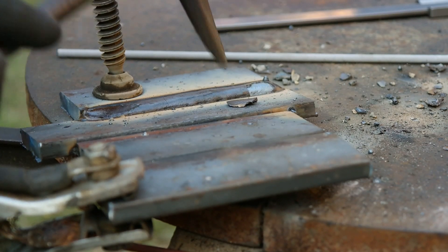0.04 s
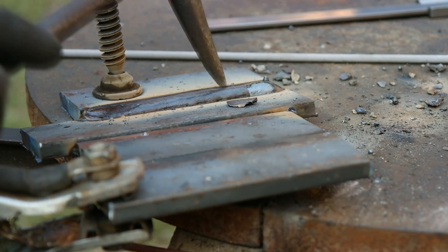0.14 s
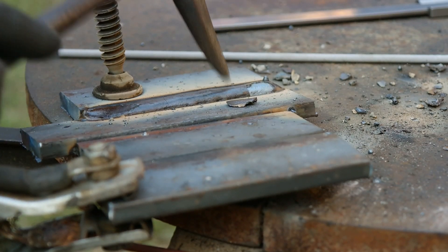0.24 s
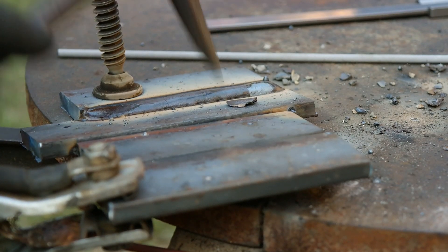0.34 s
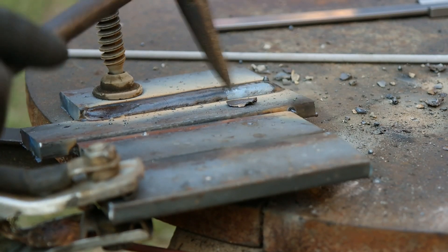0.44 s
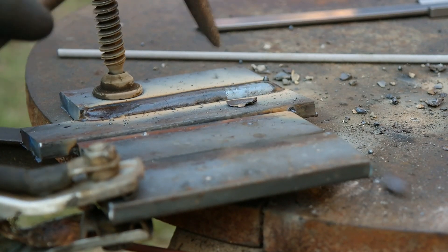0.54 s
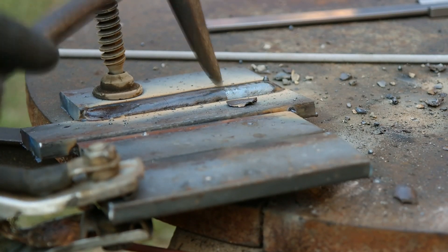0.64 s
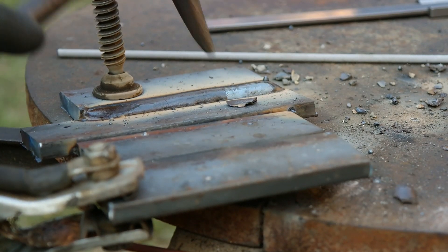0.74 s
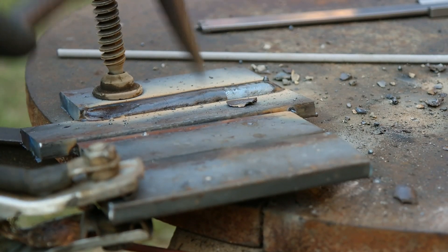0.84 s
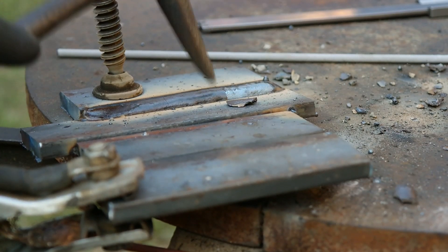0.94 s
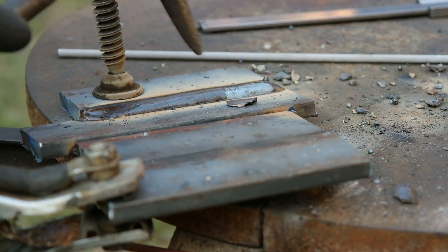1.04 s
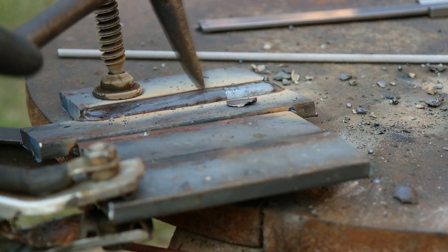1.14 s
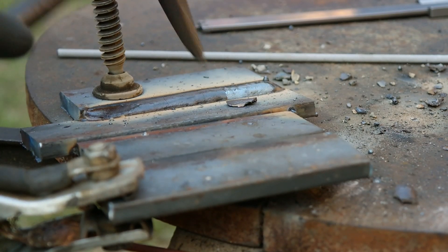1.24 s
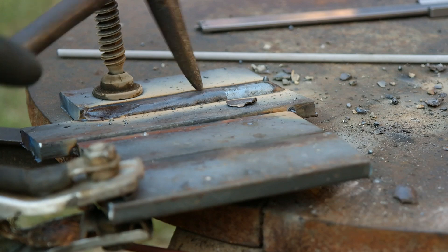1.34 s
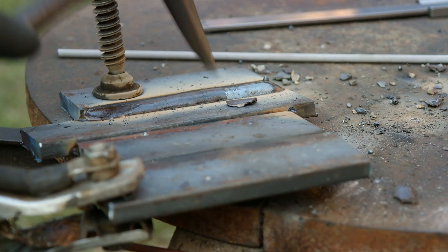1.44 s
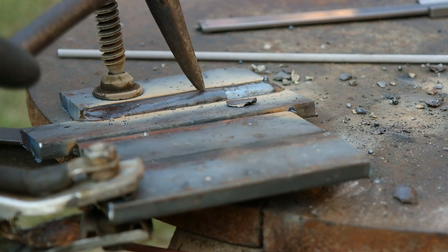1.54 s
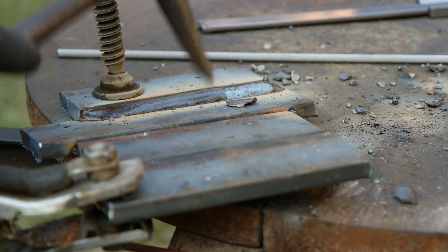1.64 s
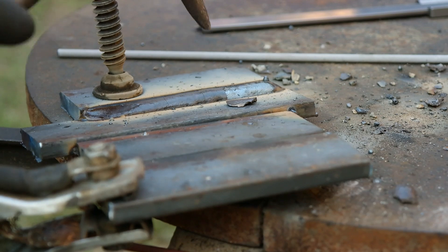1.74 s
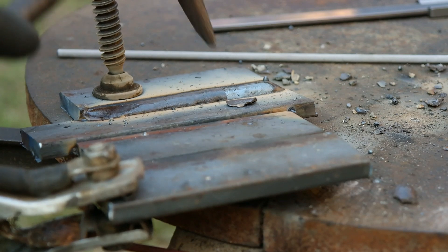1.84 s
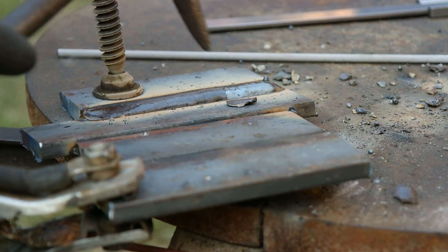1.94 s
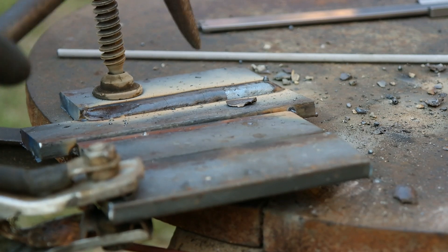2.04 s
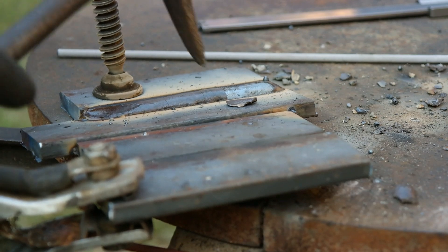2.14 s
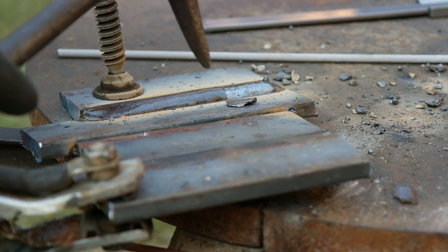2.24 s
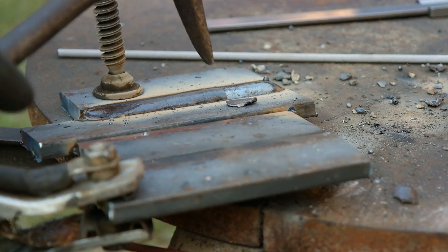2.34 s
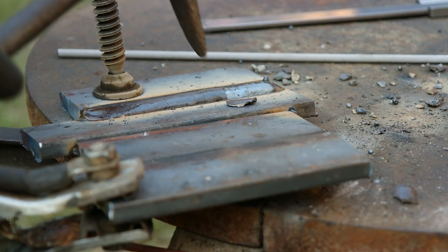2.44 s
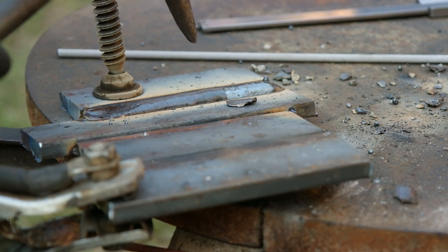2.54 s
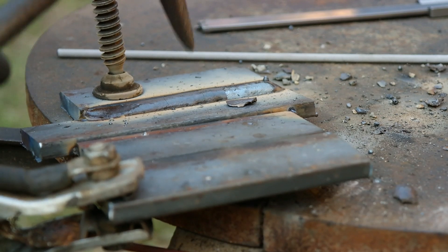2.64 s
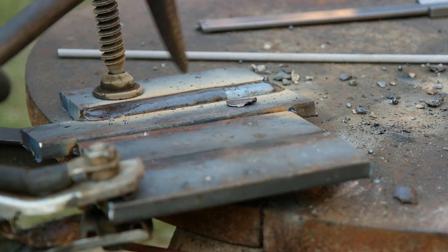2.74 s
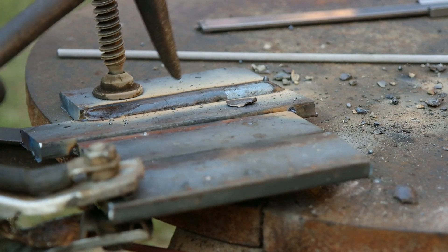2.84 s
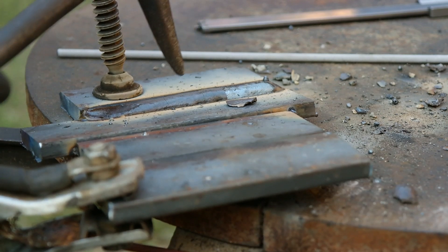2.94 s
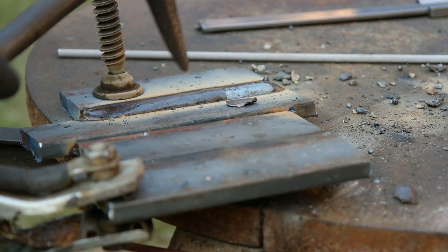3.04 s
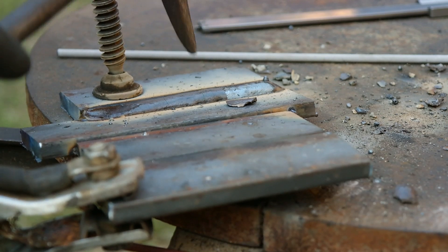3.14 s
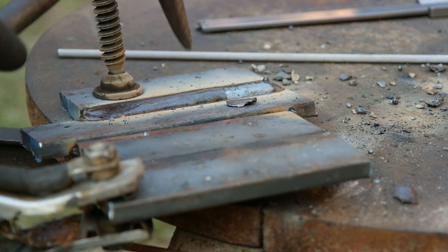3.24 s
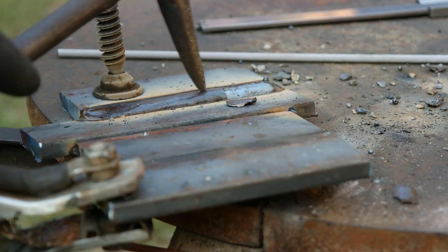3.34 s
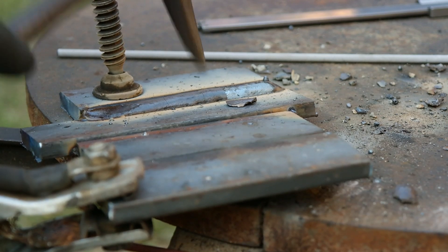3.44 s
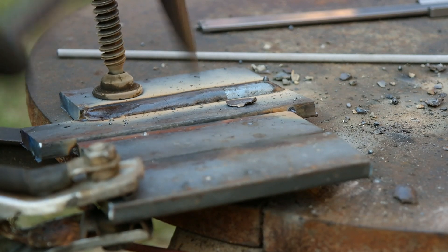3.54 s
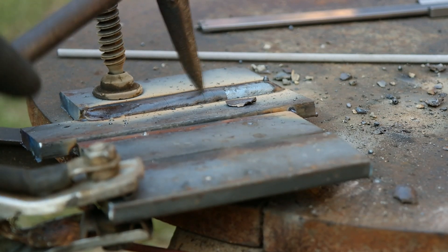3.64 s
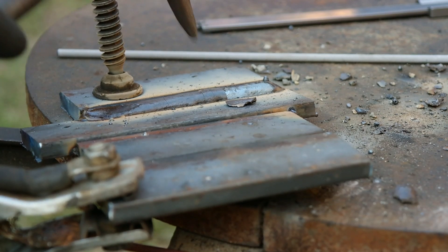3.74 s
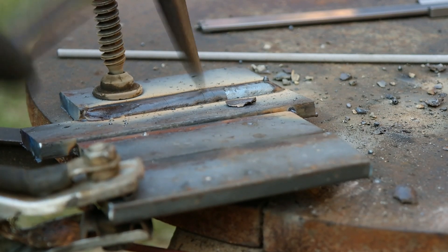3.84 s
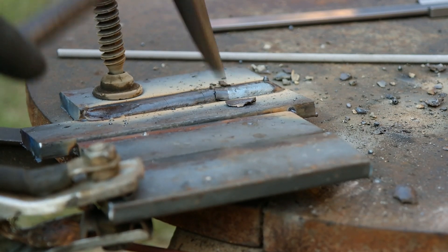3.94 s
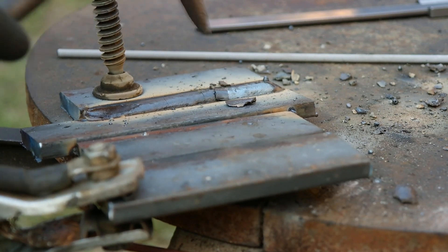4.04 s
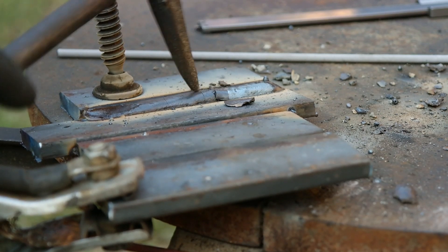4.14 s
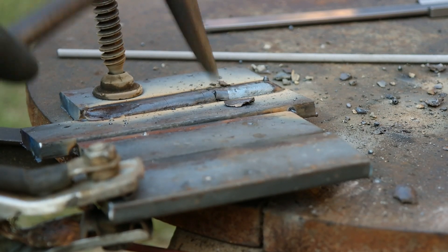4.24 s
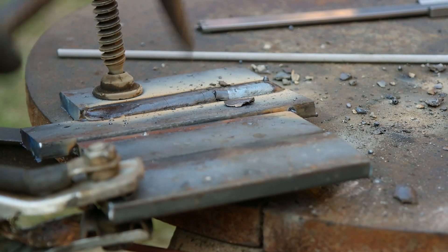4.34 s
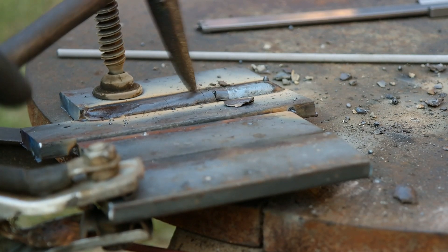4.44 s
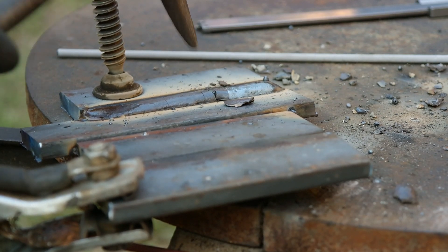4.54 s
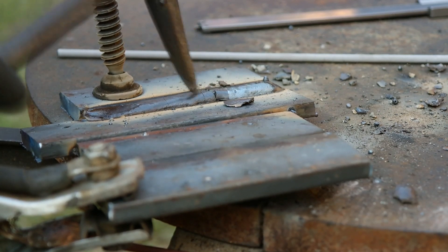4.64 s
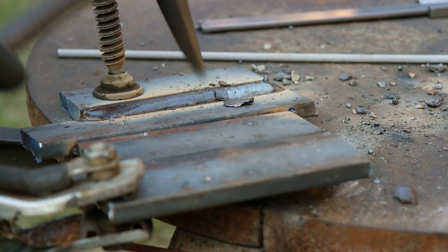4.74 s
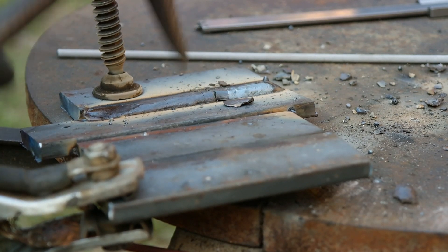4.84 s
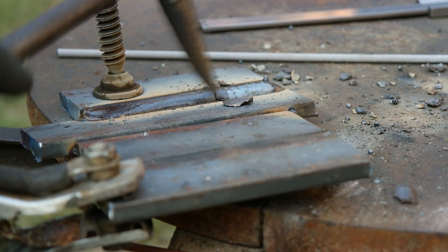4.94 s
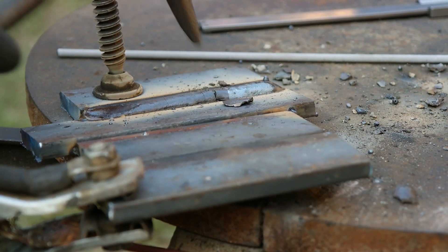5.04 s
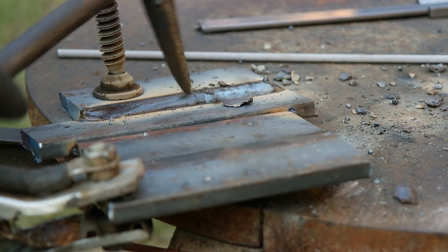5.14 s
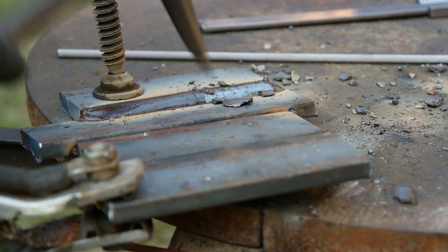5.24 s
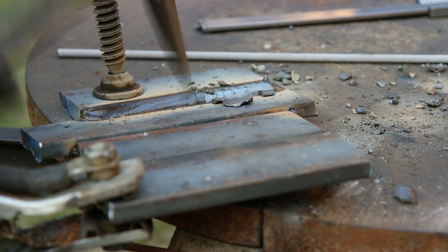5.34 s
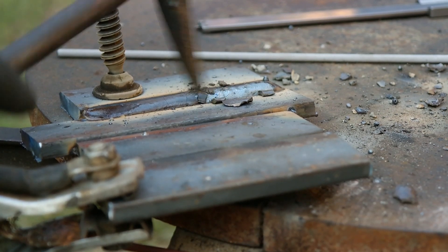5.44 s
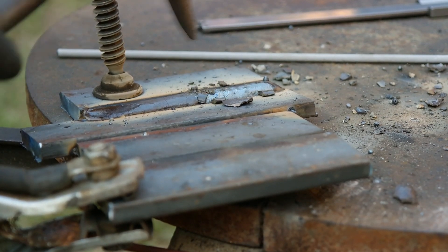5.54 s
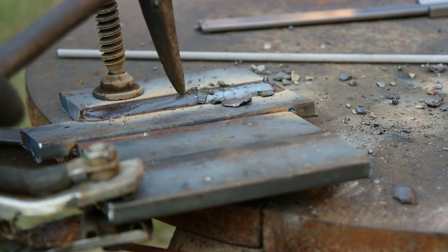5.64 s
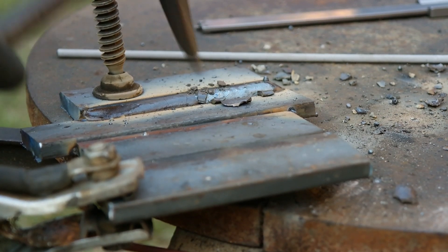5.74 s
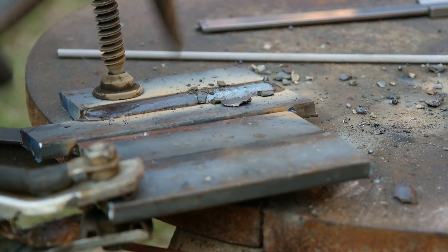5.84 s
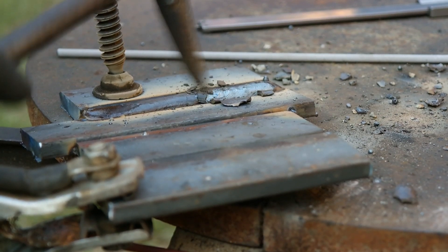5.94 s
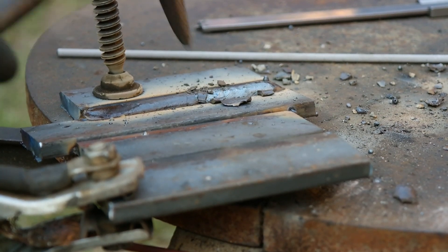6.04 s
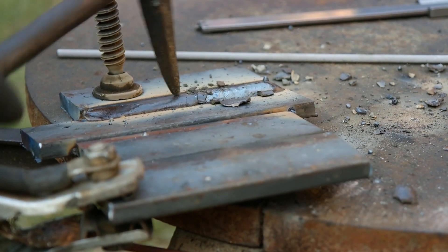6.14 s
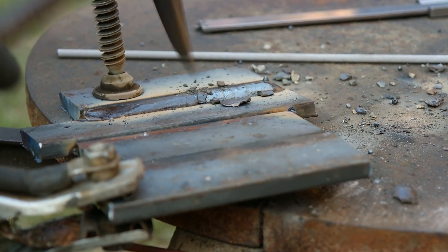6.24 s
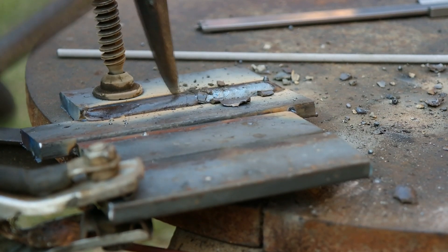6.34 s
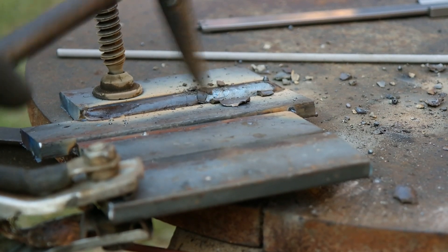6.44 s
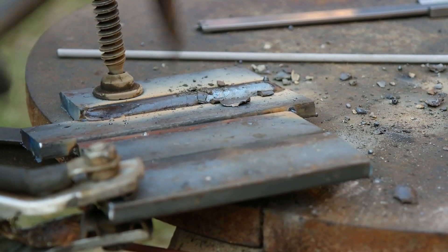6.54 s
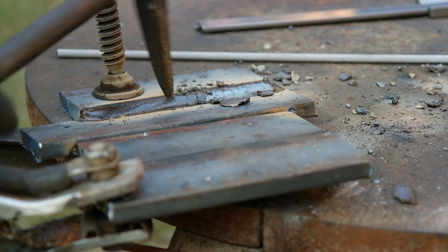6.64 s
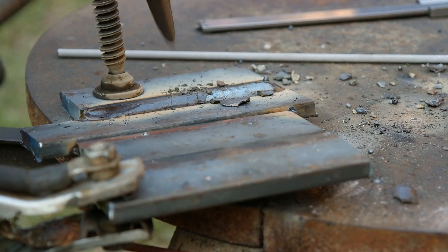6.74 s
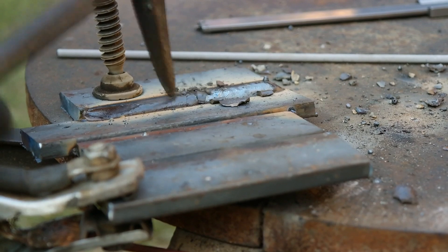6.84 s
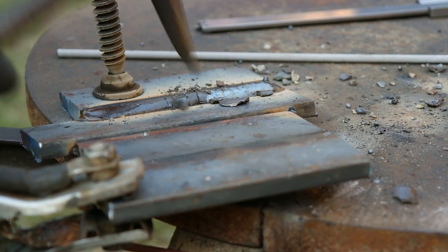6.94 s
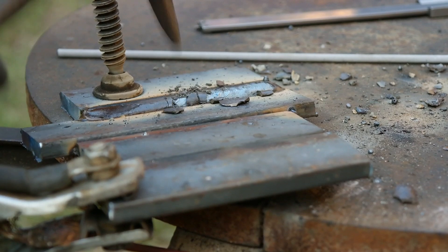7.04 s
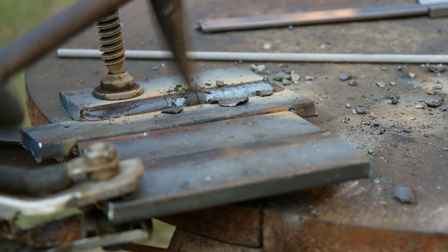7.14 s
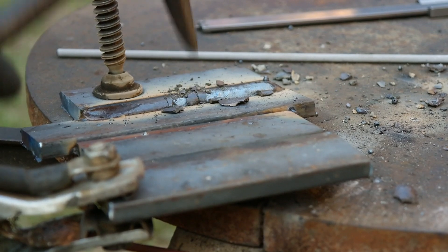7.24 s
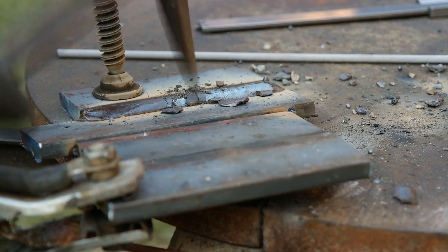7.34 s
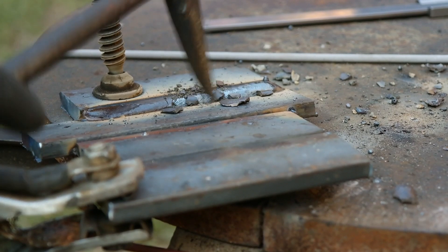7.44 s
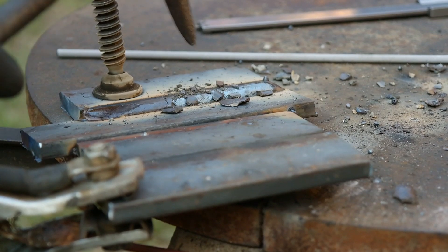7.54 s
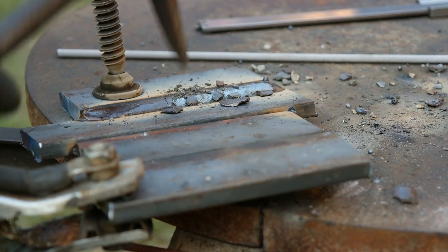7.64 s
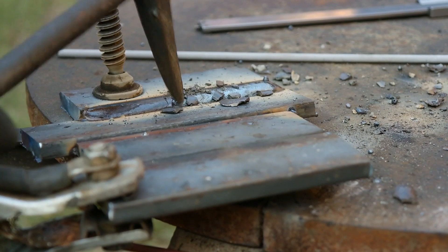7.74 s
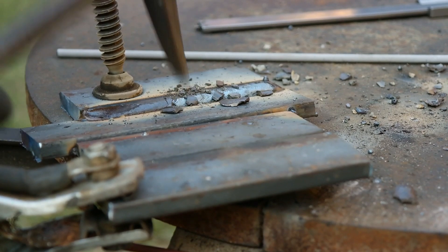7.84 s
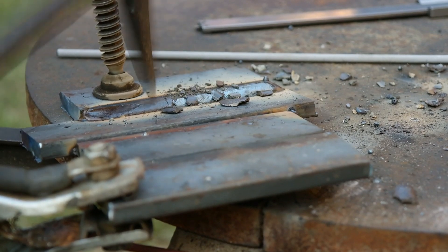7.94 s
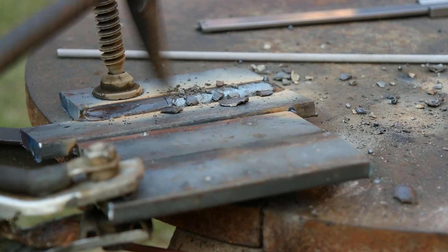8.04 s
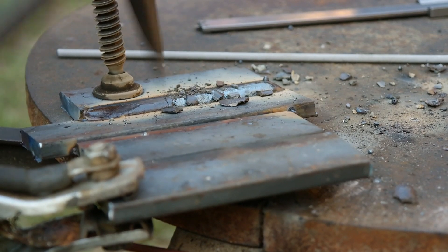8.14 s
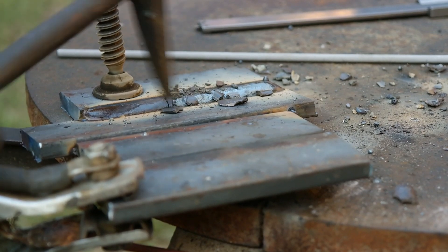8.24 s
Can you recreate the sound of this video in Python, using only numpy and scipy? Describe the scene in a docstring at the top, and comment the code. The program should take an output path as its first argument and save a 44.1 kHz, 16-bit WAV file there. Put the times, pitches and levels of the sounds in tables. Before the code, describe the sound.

In a quiet yard, close to a stereo microphone, a steel chipping hammer begins striking slag on a weld almost at once. Eight blows fall from 0.06 to 1.7 s, roughly four a second: hard broadband cracks, briefly ringing hammer head, clanking plate and table, thin bar ring and loose rattle. The blow near 0.8 s is weaker with a strong high ping. The hammering then pauses over faint hiss, low wash, hum and rumble. From 2.2 to 2.6 s a flurry of dull hollow pops glides down in pitch amid soft scrabbling; a loose plate clinks faintly at 3.0 s. Blows resume at 3.47 s, steady every quarter second, becoming squarer and brighter, slag crumbling, with small rebounds and high pings of fragments, clearest from 5.3 s. Soft clinks come near 7 s, an irregular double hit at 7.5, weaker taps around 7.9, and a very loud overloaded crack at 8.1 s, ringing into the end at about 8.3 s.

```python
"""A yard: a steel chipping hammer strikes slag on a weld, about four blows a second, close to a stereo microphone.
Each blow is a noise crack with decaying modes of hammer head, steel table and bar, a rattle and a high ping.
Small knocks and rebounds snap around the blows, a loose plate clinks, and in a pause dull pops glide down in pitch.
Filtered noise gives the hiss, low wash and rumble, and wavering sines a faint hum; loud blows overload."""
import sys
import numpy as np
from scipy import signal
from scipy.fft import rfft, irfft, next_fast_len
from scipy.io import wavfile
from scipy.ndimage import uniform_filter1d

SR = 44100
rng = np.random.default_rng(int(sys.argv[2]) if len(sys.argv) > 2 else 0)


def put_to_file(sound):
    """Save the sound as 16-bit audio at rate SR, in the file named by the first command-line argument."""
    columns = np.atleast_2d(sound).T  # one column per channel
    safe = np.clip(columns, -1, 1)
    whole_steps = np.round(safe * 32767)
    wavfile.write(sys.argv[1], SR, whole_steps.astype(np.int16))


N = 366030  # samples


def gain_of(db):
    """Level law: 20 dB is a factor of ten in amplitude."""
    return 10 ** (np.asarray(db) / 20)


def evened(x):
    """Normalization: scale to unit root mean square."""
    return x / np.sqrt(np.mean(x ** 2) + 1e-20)


def read(points, hz):
    """Spectral envelope: interpolate a curve along a logarithmic frequency axis."""
    f, value = np.transpose(points)
    return np.interp(np.log(hz + 1), np.log(f + 1), value)


def add(mix, start_s, sound):
    """Superposition: pressures of overlapping sounds add."""
    part = mix[..., round(start_s * SR):][..., :sound.shape[-1]]
    part += sound[..., :part.shape[-1]]


def ring(modes, db, spread_db, detune, buzz_db, rise_s, seconds):
    """Modal decay: dying sines with chance in level and pitch; loose contact makes each one buzz."""
    hz, mode_db, t60 = np.transpose(modes)[..., None]
    t = np.arange(round(seconds * SR)) / SR
    share, pitch, phase = rng.standard_normal((3, len(modes), 1))
    steps = rng.standard_normal((len(modes), round(seconds * 60) + 2))  # 60 a second
    buzz = np.array([np.interp(t, np.arange(len(v)) / 60, v) for v in steps])
    level = gain_of(db + mode_db + spread_db * share + buzz_db * buzz - 60 * t / abs(t60))
    sines = np.sin(2 * np.pi * hz * (1 + detune * pitch) * t + phase)
    return (level * sines).sum(0) * (1 - np.exp(-t / rise_s))


def burst(colour, t60, tilt_db, flicker_db, same, seconds):
    """Frequency-dependent damping: stereo noise whose bands die at their own speeds, in uneven jolts."""
    white = rng.standard_normal((2, round(seconds * SR)))
    hz, t, z = signal.stft(white, SR, nperseg=256, noverlap=192)
    shape = gain_of(read(colour, hz) + tilt_db * np.log2((hz + 100) / 2000))
    jolts = evened(uniform_filter1d(rng.standard_normal(z.shape[1:]), size=24, axis=0))
    right = same * z[0] + np.sqrt(1 - same ** 2) * z[1]
    z = np.array([z[0], right])
    decay_db = -60 * t / read(t60, hz)[:, None]
    z *= evened(shape)[:, None] * gain_of(flicker_db * jolts + decay_db)
    return signal.istft(z, SR, nperseg=256, noverlap=192)[1]


# level of the low rumble: time_s, level_db
RUMBLE_LEVEL = [(0.0, -66), (1.23, -72), (1.55, -65), (1.92, -75), (2.36, -66.5), (3.47, -76.5),
                (3.65, -76), (4.64, -74), (4.99, -58), (5.52, -71), (5.85, -60), (6.24, -72), (6.63, -58),
                (7.03, -74), (7.74, -61), (8.3, -95.5)]


def rumble():
    """Partial coherence: band-passed low noise that comes and goes, partly different in each channel."""
    band = signal.butter(2, [78, 135], "band", fs=SR, output="sos")
    low = signal.sosfilt(band, rng.standard_normal((3, N)))
    level_db = np.interp(np.arange(N) / SR, *np.transpose(RUMBLE_LEVEL))
    return gain_of(level_db) * evened(low[0] + .5 * low[1:])


# spectral density of the yard noise: frequency_hz, relative density_db (per Hz)
YARD_COLOUR = [(18, -53), (30, -22.5), (138, -16.5), (287, -2.5), (426, -7.5), (526, -1), (666, -10.5),
               (740, -12.5), (801, -7.5), (2410, -18.5), (3400, -20.5), (14400, -31), (16000, -31.5)]
# swelling of the two halves of the noise: time_s, relative low wash level_db, relative hiss level_db
YARD_LEVEL = [(0.0, -48, -55), (1.6, -48.5, -49), (2.01, -47, -50.5), (2.52, -47, -48),
              (2.75, -49.5, -50.5), (3.07, -48, -52), (3.28, -50.5, -56.5), (3.47, -56.5, -62.5),
              (3.65, -46, -50), (4.4, -48.5, -57), (4.8, -47.5, -53), (5.6, -45.5, -53), (6.2, -48.5, -50),
              (7.2, -47, -48), (7.8, -47.5, -54), (8.3, -47.5, -51)]
# left-right correlation of the noise: frequency_hz, likeness (ratio)
YARD_LIKENESS = [(60, .8), (240, 0.97), (950, 0.57), (3770, 0.054), (15000, 0.15)]


def yard_noise():
    """Diffuse field: patchy noise, its likeness left and right set by pitch, whose wash and hiss swell apart."""
    frames, hz = N // 256 + 5, np.fft.rfftfreq(1024, 1 / SR)
    a, b, c, d, patches = rng.standard_normal((frames, 513, 5)).T
    patches = evened(uniform_filter1d(uniform_filter1d(patches, size=12, axis=0), size=8, axis=1))
    s, wash_db, hiss_db = np.transpose(YARD_LEVEL)
    wash_db, hiss_db = (np.interp(np.arange(frames) * 256 / SR, s, v) for v in (wash_db, hiss_db))
    # the hiss flickers
    hiss_db = hiss_db + 1.5 * evened(uniform_filter1d(rng.standard_normal(frames), size=5))
    shape, low = gain_of(read(YARD_COLOUR, hz)), 1 / (1 + (hz / 2000) ** 2)
    wash = np.outer(evened(shape * low), gain_of(wash_db))
    hiss = np.outer(evened(shape * (1 - low)), gain_of(hiss_db))
    same = np.clip(read(YARD_LIKENESS, hz), -1, 1)[:, None]
    left = a + 1j * b
    right = same * left + np.sqrt(1 - same ** 2) * (c + 1j * d)
    z = np.array([left, right]) * (wash + hiss) * gain_of(0.5 * patches)
    unit = np.sqrt(np.mean(signal.istft(left, nperseg=1024, noverlap=768)[1] ** 2))
    return gain_of(-2.5) * signal.istft(z, nperseg=1024, noverlap=768)[1][:, :N] / unit


# partials of the hum: pitch_hz, relative level_db
HUM_PARTIALS = [(533, -59), (635, -60.5), (732, -56.5), (834, -81), (931, -63.5)]


def hum():
    """Slow modulation: steady sines waver in level and phase and follow the level of the wash."""
    t = np.arange(N) / SR
    drift = rng.standard_normal((len(HUM_PARTIALS), N))
    waver = evened(uniform_filter1d(drift, size=4000, axis=1))
    tones = sum(gain_of(db + 1.0 * w) * np.sin(2 * np.pi * f * t + 0.83 * w)
                for (f, db), w in zip(HUM_PARTIALS, waver))
    s, wash_db, _ = np.transpose(YARD_LEVEL)
    return tones * gain_of(np.interp(t, s, wash_db) + 53.5)


# dull pops that fall in pitch: start_s, level_db, end pitch_hz, start pitch (factor), t60_s
POP_EVENTS = [(2.212, -36, 525, 3.9, 0.036), (2.249, -33, 750, 3.5, 0.025), (2.299, -37, 730, 2.4, 0.03),
              (2.335, -30, 383, 2.7, 0.044), (2.41, -28, 343, 3.2, 0.032), (2.469, -25.5, 328, 2.4, 0.037),
              (2.504, -26.5, 600, 2.4, 0.045), (2.526, -22.5, 656, 3.9, 0.04),
              (2.564, -32, 586, 2.5, 0.049), (2.591, -23, 613, 4.4, 0.037)]


def pops():
    """Frequency glide: each pop slides to its pitch in milliseconds, with a hollow thud and faint scrabbling."""
    mix, t = np.zeros(N), np.arange(3000) / SR
    for s, db, hz, start, t60 in POP_EVENTS:
        turns = np.cumsum(hz * (1 + (start - 1) * np.exp(-t / 0.0011))) / SR
        glide = np.minimum(t / 0.001, 1) * np.sin(2 * np.pi * turns)
        add(mix, s, gain_of(db - 60 * t / abs(t60)) * glide)
        thud_hz = 330 + 350 * (s - 2.25)  # later thuds are higher
        thud = np.minimum(t / 0.0025, 1) * np.sin(2 * np.pi * thud_hz * t)
        add(mix, s + 0.00346, gain_of(db - 2.0 - 60 * t / 0.037) * thud)
        tick = uniform_filter1d(rng.standard_normal(len(t)), size=6)
        add(mix, s, gain_of(db - 10 - 60 * t / 0.025) * tick)
    # scrabbling: about 320 random grains a second at its busiest
    busy = np.interp(np.arange(N) / SR, [2.15, 2.25, 2.6, 2.75], [0, 1, 1, 0])
    grains = (rng.random(N) < 320 / SR) * rng.standard_normal(N) * busy
    tones = sum(part * np.sin(2 * np.pi * hz * t) for hz, part in [(330, 1), (950, 0.72), (2600, 0.12)])
    grain = gain_of(-44.5 - 60 * t / 0.024) * tones
    high_pass = signal.butter(2, 160, "high", fs=SR, output="sos")
    return signal.sosfilt(high_pass, mix + signal.oaconvolve(grains, grain)[:N])


# soft clinks: start_s, level_db
CLINK_EVENTS = [(3.0066, -33), (3.047, -41.5), (6.9546, -25.5), (7.1561, -29.5)]
# modes of the loose plate: pitch_hz, level_db (about the clink), t60_s
CLINK_MODES = [(1325, 11.5, 0.035), (1420, 4, 0.043), (2095, -15, 0.14), (778, -7, 0.15)]


def clinks(mix):
    """Modal decay with a slow rise: a loose plate clinks softly."""
    for s, db in CLINK_EVENTS:
        add(mix, s, ring(CLINK_MODES, db, 1.1, 0.0031, 1.1, 0.01, 0.066))


# spectral density of first contact: frequency_hz, relative density_db (per Hz)
CRACK_COLOUR = [(24, -56.5), (40, -51), (896, -17), (1410, 4), (2440, -4), (2980, -6), (7360, -11.5),
                (8130, -13), (11600, -21), (16000, -23)]
SNAP_T60 = .021  # s, added damping of the snap of a knock or landing


def crack(db, tilt_db, t60):
    """Impulsive excitation: first contact is a short broadband snap."""
    noise = burst(CRACK_COLOUR, [(100, 0.16), (16000, 0.033)], tilt_db, 4.44, 0.68, 0.057)
    return gain_of(db - 60 * np.arange(noise.shape[1]) / SR / t60) * noise


# small extra knocks and rebounds around the blows:
# start_s, snap level_db, treble tilt_db (per octave), head ring level_db
KNOCK_EVENTS = [(0.642, -27.5, 8, -75), (0.6514, -45, 10.5, -60.5), (0.9827, -56, 12.5, -74.5),
                (1.1544, -57.5, 8.5, -69), (1.952, -35.5, 5.5, -62), (3.928, -24.5, -5, -33.5),
                (4.2958, -20, -2.5, -25), (5.4526, -31, -.5, -40), (5.5414, -11, 0.5, -23),
                (5.9904, -50, 7, -65), (6.948, -49, -5, -43), (7.1547, -38, -3, -37.5),
                (7.2616, -30.5, -5, -29), (7.9282, -13, -4.5, -24), (8.249, -29.5, -2, -33.5)]


def knocks(mix):
    """Light impact: each small knock or rebound is a snap with a light ring of the head modes."""
    for s, db, tilt_db, head_db in KNOCK_EVENTS:
        add(mix, s, crack(db, tilt_db, SNAP_T60))
        octaves = np.log2(np.transpose(HEAD_MODES)[0][:, None] / 2000)
        add(mix, s, ring(HEAD_MODES, head_db + tilt_db * octaves, 1.9, 0.0032, 1.5, 0.0011, 0.18))


# modes of the small hard piece: pitch_hz, level_db (about the ping)
PING_MODES = [(12665, 0), (7385, -14)]


def ping(db):
    """Small-body resonance: the small loose piece gives a thin high note."""
    modes = [(hz, mode_db, 0.068) for hz, mode_db in PING_MODES]  # t60 in s
    return ring(modes, db, 0.59, .001, 2.1, 0.0025, 0.6)


# landings of the small piece: start_s, ping level_db
LANDING_EVENTS = [(1.3164, -35), (3.7983, -37), (4.342, -30), (5.0789, -40), (5.3283, -25), (5.5812, -31),
                  (6.329, -33.5), (6.564, -19.5), (6.8197, -18.5), (7.0663, -38.5), (7.29, -35),
                  (7.9483, -25), (8.1823, -32)]


def landings(mix):
    """Secondary impact: the small piece lands with a ping and a quieter dry tick."""
    for s, db in LANDING_EVENTS:
        add(mix, s, ping(db))
        add(mix, s, crack(db - 9.5, 6.0, SNAP_T60))


# spectral density of loose pieces: frequency_hz, relative density_db (per Hz)
RATTLE_COLOUR = [(24, -78.5), (40, -28), (312, -13.5), (392, -22), (455, -19), (516, -5.5), (715, -10),
                 (1300, -4), (2570, -17), (2910, -12.5), (13100, -35.5), (14800, -34.5), (16000, -64)]
# damping of the rattle: frequency_hz, t60_s
RATTLE_DECAY = [(100, 0.27), (500, 0.13), (1300, 0.51), (3000, 0.34), (7000, 0.33), (14000, 0.4)]


def rattle(force_db, tilt_db):
    """Random repeated contact: loose pieces rattle on as decaying noise."""
    return gain_of(force_db) * burst(RATTLE_COLOUR, RATTLE_DECAY, tilt_db, 1.5, 0.3, 0.45)


# the many faint modes of the table top: pitch_hz
SHIMMER_HZ = np.sort(rng.uniform(1500, 15300, size=70))


def shimmer(force_db, tilt_db, square):
    """High modal density: many faint modes blur; square blows ring them longer."""
    octaves = np.log2(SHIMMER_HZ / 2000)
    t60 = 0.35 + 0.18 * square - 0.054 * octaves
    modes = np.transpose([SHIMMER_HZ, (tilt_db - 5.0) * octaves, t60])
    return ring(modes, force_db - 23.5, 5.3, .0005, 0.83, 0.0041, 0.31)


def spread(shares, square, place, modes):
    """Modal participation: squareness and place of the blow set the level of each mode."""
    hz, *corners_db = np.transpose(shares)
    weights = np.outer([1 - place, place], [1 - square, square]).ravel()
    db = weights @ np.array(corners_db)
    return read(np.transpose([hz, db]), np.transpose(modes)[0])[:, None]


# thin long rings of bar and clamp, some in beating pairs: pitch_hz, level_db (about the blow's there), t60_s
BAR_MODES = [(4621, -1, .45), (4640, -5, .36), (5539, 3, 1.3), (5809, -1, .25), (6051, 0.1, .35),
             (6936, 0, .6), (6955, -9, .5), (7370, -5, .3), (7935, -9, .44), (8236, -9, .38),
             (8920, -5, .3), (9235, 0.1, .5), (9256, -6, .5), (10180, -4, .5), (10812, 0.1, .75),
             (14990, -6, .6)]
# share of a blow in the bar: pitch_hz, level_db of a glancing and of a square blow at the start of the bead,
# level_db of the same two at its end
BAR_SHARES = [(4547, -1, -0.5, -3, 6), (5539, -30, -24.5, -25.5, -18.5), (5840, -7.5, -2.5, -8.5, -4),
              (7060, -9.5, -3, -5.5, -2), (9290, -21.5, -11, -9, -6.5), (10812, -27, -21.5, -24.5, -17)]


def bar(s, next_s, bar_db, square, place):
    """Contact damping: the next blow jolts the bar and stills its old ring; glancing blows die sooner."""
    level_db = bar_db + spread(BAR_SHARES, square, place, BAR_MODES)
    sound = ring(BAR_MODES, level_db, 1.9, 0.00015, 1.6, 0.0018, .6)
    t = np.arange(len(sound)) / SR
    after_next = np.maximum(s + t - next_s, 0)
    glance_damp = 69.5 * (1 - square)  # dB per s
    return sound * gain_of(-60 * after_next / .08 - glance_damp * t)


# plates and table: pitch_hz, level_db (about the blow's there), t60_s
TABLE_MODES = [(217, 2, 0.14), (272.4, 5, 0.092), (396, -4.5, 0.25), (528.6, -0.2, 0.39), (590, -10, 0.62),
               (767, -4, 0.15), (829, -10, 0.6), (907, 3, 0.11), (1122, -7.5, 0.82), (1157, -6, 0.64),
               (1356, -18, .35), (1517, -5, 0.25), (1470, -9.5, 0.69), (1980, -5, 0.56), (2213, 3, 0.39),
               (2320, -4.5, 0.33), (3020, -2, .42)]
# share of a blow in the table: pitch_hz, level_db of a glancing and of a square blow at the start of the bead,
# level_db of the same two at its end
TABLE_SHARES = [(245.5, -5.5, -13.5, 4, -14), (528, 8.5, 1.5, 12, 2.5), (1160, -.5, 1.5, -1.5, 3.5),
                (2207, -4, -2.5, -12.5, -10), (2977, -24.5, -2, -8, -3.5)]


def table(table_db, square, place):
    """Inertia: heavy steel takes time to pick up, then rings on."""
    level_db = table_db + spread(TABLE_SHARES, square, place, TABLE_MODES)
    return ring(TABLE_MODES, level_db, 2.4, 0.0013, 3.25, 0.0022, 0.65)


# the hammer head, damped by hand and slag: pitch_hz, level_db (about the blow's there), t60_s
HEAD_MODES = [(1148.4, -4, 0.096), (1302, -11.5, 0.2), (1408, 5, 0.042), (1479, -2.5, 0.081),
              (1740, -28, 0.027), (2054, 5.5, 0.044), (2134, 3.5, 0.013), (2956, 7, 0.038),
              (3754, -5, 0.053), (4094, -3.5, 0.069), (5036, 2.5, 0.04), (5226, 2.5, 0.036),
              (5950, -2, 0.035), (7370, 1.9, 0.049), (9060, -5.5, .05), (11330, 1.5, 0.044),
              (13300, -1, .04), (15100, 5, 0.026)]
# share of a blow in the head: pitch_hz, level_db of a glancing and of a square blow at the start of the bead,
# level_db of the same two at its end
HEAD_SHARES = [(1170, 13, 12, 27.5, 9), (1440, 17.5, 12, 7, 1), (1930, 12, 12, 3.5, 0),
               (3140, 8, 16.5, 7, 16.5), (5130, 6, 5, 5.5, 1.5), (7270, 5, 10.5, 10.5, 10),
               (11800, 3.5, 2.5, 13, 6.5), (14060, -18.5, -21.5, -10, -4)]


def head(force_db, square, place):
    """Heavily damped resonance: the hammer head speaks at once and rings briefly."""
    level_db = force_db + spread(HEAD_SHARES, square, place, HEAD_MODES)
    return ring(HEAD_MODES, level_db, 0.37, 0.0062, 0.41, 0.00028, 0.38)


def crumble(crack_db, tilt_db):
    """Brittle fracture: slag crumbles as a softer, longer noise under the crack."""
    t60 = [(300, 0.033), (3000, 0.089), (14000, 0.088)]  # (Hz, s)
    return gain_of(crack_db - 22.5) * burst(CRACK_COLOUR, t60, tilt_db, 0.68, 0.78, 0.1)


def strike(mix, next_s, s, force_db, crack_db, square, place, table_db, bar_db, ping_db):
    """Impact excitation: one blow sets every part sounding, brighter when it is square."""
    tilt_db = 2.35 * square  # per octave
    add(mix, s, crack(crack_db, tilt_db, 0.015))
    add(mix, s, crumble(crack_db, tilt_db))
    add(mix, s, head(force_db, square, place))
    add(mix, s, table(table_db, square, place))
    add(mix, s, bar(s, next_s, bar_db, square, place))
    add(mix, s, shimmer(force_db, tilt_db, square))
    add(mix, s, rattle(force_db, tilt_db))
    add(mix, s, ping(ping_db))


# blows and rebounds: start_s, force level_db, crack level_db, squareness (0 glancing - 1 square),
# place along the bead (0-1), table level_db, bar level_db, ping level_db
BLOW_EVENTS = [(0.0579, -22, 0, 0.37, 0, -33, -32.5, -38), (0.3089, -23, -2, .95, 0, -34, -35.5, -43),
               (0.5305, -24, 1.5, .6, 0.3, -33, -29.5, -29),
               (0.7964, -35.5, -7.5, 0.17, 0.67, -42, -37.5, -8.5),
               (1.0152, -22.5, 1, .17, 0.21, -30.5, -25.5, -41),
               (1.2587, -23, -1, .23, 0.23, -30, -29, -38), (1.4784, -23, -1, 0.13, 0.4, -31.5, -29.5, -37),
               (1.6983, -21.5, 3.5, 0.45, .2, -31, -29, -38),
               (3.473, -24, -6, 0.42, 0.3, -33.5, -31.5, -34), (3.735, -23, 0, 0.84, .1, -32, -30.5, -36),
               (4.0019, -23, -4, 0.069, 0.31, -31, -28.5, -18),
               (4.278, -21.5, -2, 0.64, 0.28, -29, -27.5, -32), (4.5506, -22, 4, 1, 0.6, -30.5, -29, -43),
               (4.789, -21, 4, 0.78, 0.5, -29.5, -30, -26), (5.024, -21.5, -1, 1, .5, -31, -30.5, -35),
               (5.2758, -22.5, 2, 0.35, 0.55, -27.5, -26, -18),
               (5.524, -23.5, 4, 0.21, 0.93, -30, -27.5, -17), (5.7791, -20.5, 2, 1, 0.7, -31.5, -29, -15),
               (6.0285, -21, 3, 1, 0.97, -32.5, -30, -15),
               (6.2693, -21.5, 2.5, 0.86, 0.9, -31.5, -29.5, -24),
               (6.5092, -21, 5, 0.56, 0.73, -32.5, -28, -17), (6.7483, -21.5, 5, .9, .7, -28, -30.5, -14),
               (6.9875, -22.5, 2, 0.93, 1, -30.5, -29.5, -30), (7.2376, -20.5, 1, 1, 0.9, -28.5, -32, -19),
               (7.523, -27.5, -9, 0.49, 1, -32, -24.5, -3.5), (7.5497, -26, 1.5, 0.47, .4, -42, -35, -40),
               (7.8654, -24.5, -9.5, 0.34, 0.47, -30.5, -43, -38),
               (7.9171, -33.5, -14.5, 0.68, 0.8, -55, -63, -21),
               (8.1192, -21.5, 8, 0.77, .8, -34.5, -28, -27)]


def hammering():
    """Superposition of impacts: all blows, with the landings, small knocks and clinks around them."""
    mix = np.zeros((2, N))
    next_starts = [later[0] for later in BLOW_EVENTS[1:]] + [N / SR]
    for row, next_s in zip(BLOW_EVENTS, next_starts):
        strike(mix, next_s, *row)
    landings(mix)
    knocks(mix)
    clinks(mix)
    return mix


# phase between the microphone ports: frequency_hz, left lead_rad
PORT_LEAD = [(0, -1), (3010, 0.4), (3620, 0.9), (4650, 8), (6120, 7), (6980, 4.5), (7580, 4), (8270, 7.5),
             (9220, 8), (10600, 7.5), (11400, 0.7), (14700, 1.5), (15200, -9.5), (15900, 11)]
# level between the microphone ports: frequency_hz, left over right level_db
PORT_LEAN = [(60, 0.5), (110, -0.5), (200, 1), (380, 0.5), (700, 1), (1290, -0.5), (2380, -1), (4400, -1),
             (8120, 2.5), (15000, 0.5)]


def ports(near):
    """Interchannel difference: a near sound reaches two ports with phase and level that differ by pitch."""
    size = next_fast_len(N + 4096)
    hz = np.fft.rfftfreq(size, 1 / SR)
    port = gain_of(read(PORT_LEAN, hz) / 2) * np.exp(.5j * read(PORT_LEAD, hz))
    return irfft(rfft(near, size) * np.array([port, 1 / port]), size)[:, :N]


def scene():
    """Superposition: near sounds pass the two ports; the yard and rumble lie around them."""
    return ports(hammering() + pops()) + yard_noise() + hum() + rumble()


def record(dry):
    """Overload and band limiting: the input clips, loses its lowest bass, clips again and loses its top."""
    high_pass = signal.butter(1, 50, "high", fs=SR, output="sos")
    wet = signal.sosfilt(high_pass, np.clip(dry, -1.1, 1.1))
    taps = signal.firwin(151, 15900, window=("kaiser", 7), fs=SR)  # low-pass edge in Hz
    return signal.oaconvolve(np.clip(wet, -1, 1), taps[None], "same")


dry = scene()
out = record(dry)
put_to_file(out)
```